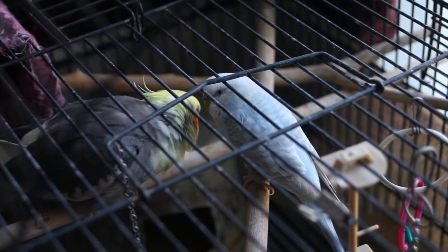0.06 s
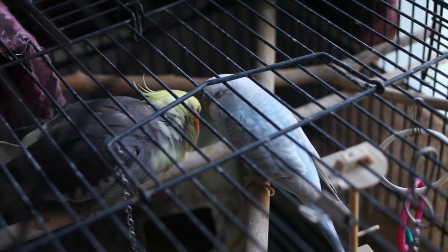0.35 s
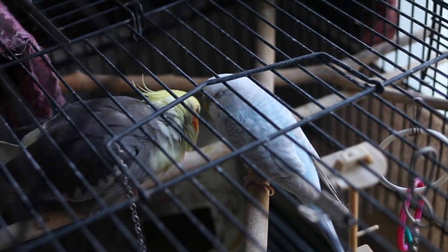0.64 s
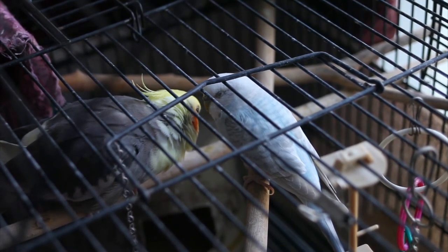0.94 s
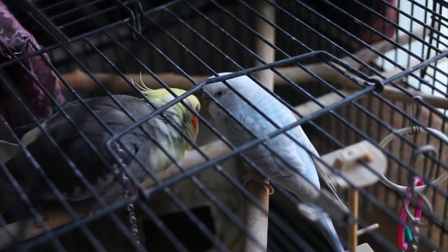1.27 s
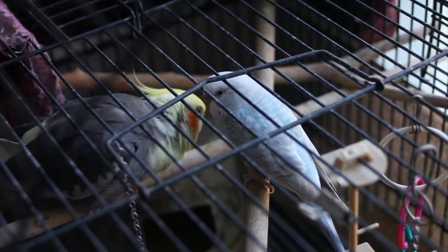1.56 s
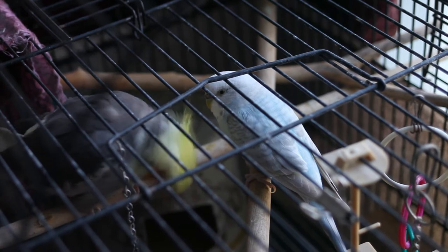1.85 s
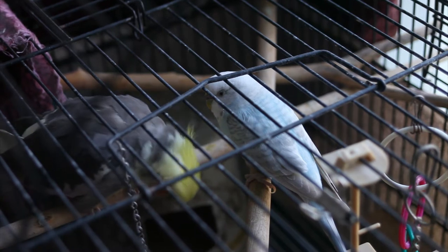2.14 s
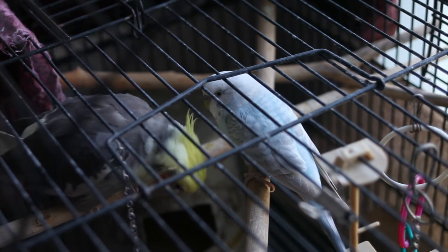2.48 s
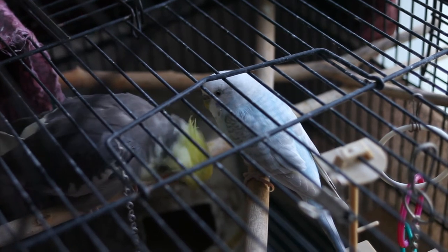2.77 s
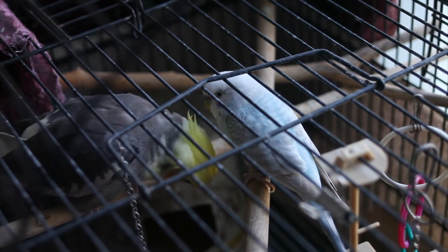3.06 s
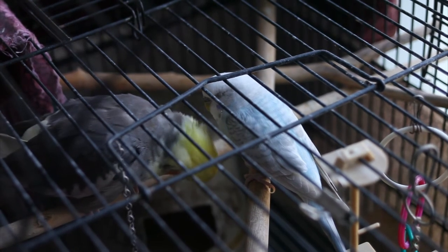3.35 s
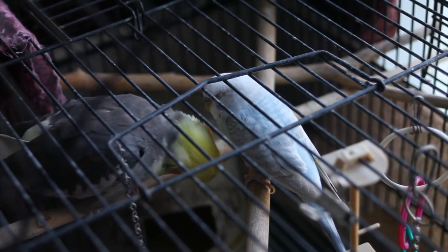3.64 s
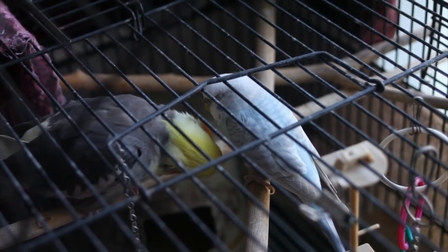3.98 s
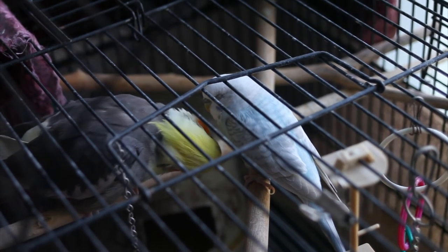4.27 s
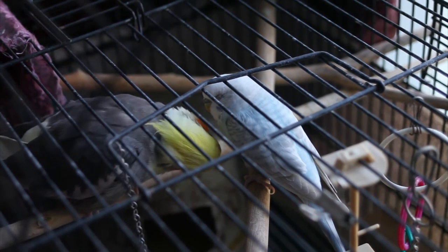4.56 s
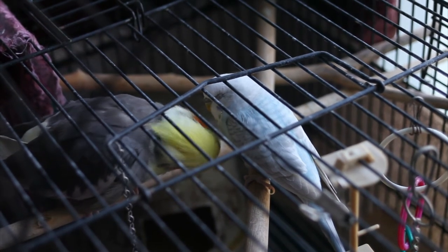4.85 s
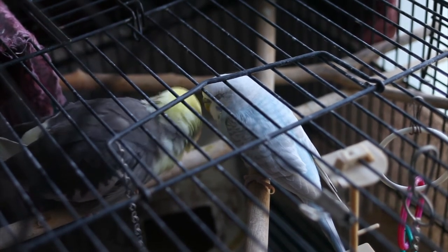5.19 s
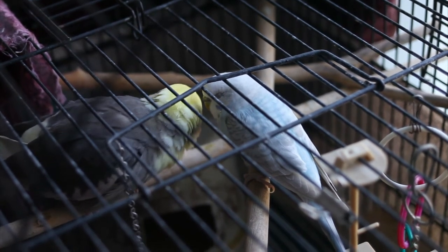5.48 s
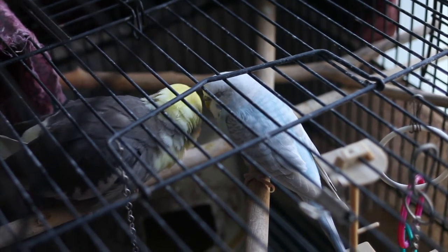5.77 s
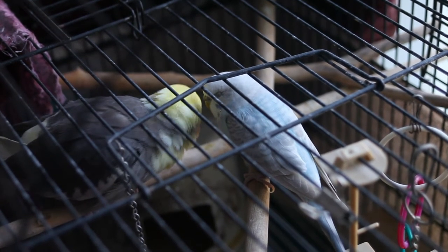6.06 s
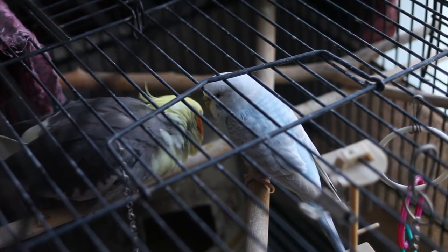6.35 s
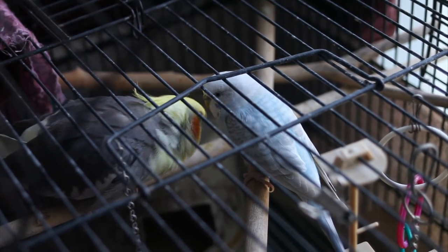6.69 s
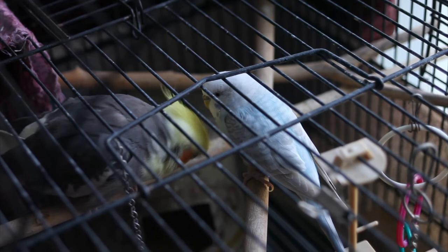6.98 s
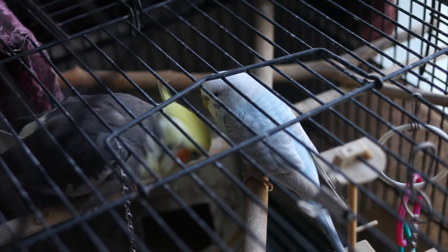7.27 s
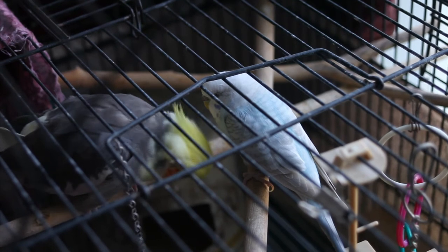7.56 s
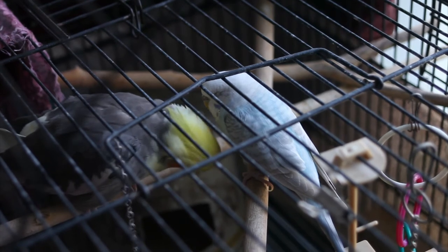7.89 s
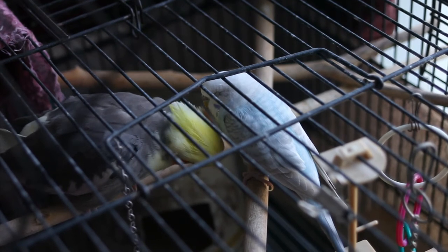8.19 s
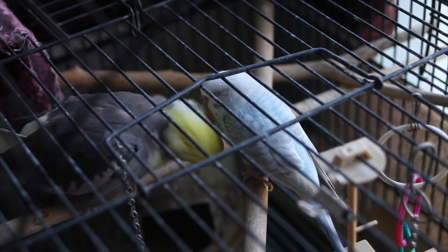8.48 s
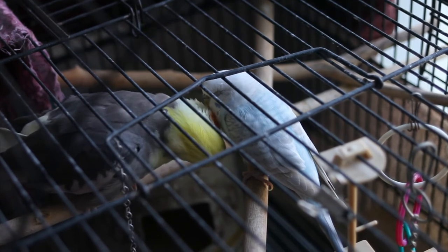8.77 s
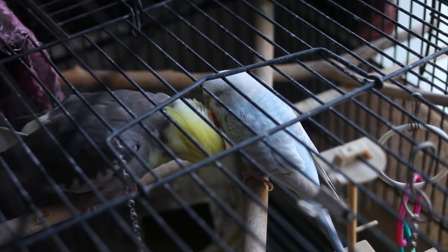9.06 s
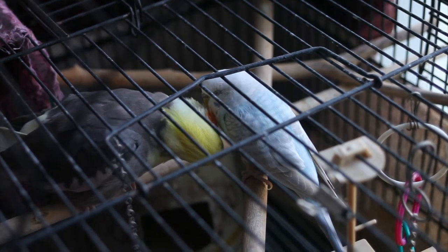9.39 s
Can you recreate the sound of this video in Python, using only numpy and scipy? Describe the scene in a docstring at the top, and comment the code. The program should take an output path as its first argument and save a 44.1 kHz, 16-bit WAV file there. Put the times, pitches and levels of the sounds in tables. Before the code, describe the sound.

In a small room, close to a cage, two small birds softly rustle their feathers. One gives a soft mew, breaks into dry clicks and whistled peeps, and ends with a sharp squawk. Three more short runs of clicking and peeping follow, with rustles and dull perch shuffles between. Behind them a motor hums steadily, a clock ticks softly and a distant bird twitters.

```python
"""A small room, the microphone close to a cage with two small birds. From the start a motor hums,
a clock ticks softly, feathers rustle in preening and a distant bird twitters. At 1.6 s one caged bird
mews and breaks into dry clicks and whistled peeps, all voiced by its syrinx, ending in a sharp squawk
at 2.2 s. A deep drone then fades from under the hum. Three more runs of chatter follow, near 4, 6.5
and 9 s, with rustles and dull shuffles on the perch in between."""
import sys
import numpy as np
from scipy import signal
from scipy.fft import rfft, irfft, next_fast_len
from scipy.io import wavfile
from scipy.ndimage import map_coordinates

SR = 44100
rng = np.random.default_rng(int(sys.argv[2]) if len(sys.argv) > 2 else 0)


def to_wav(sig):
    """Store sig (one row per channel, or 1-D mono) as 16-bit WAV at the path in sys.argv[1].

    Samples outside -1..1 are clipped; the rate is SR.
    """
    pcm = np.clip(np.atleast_2d(sig), -1, 1) * 32767
    pcm = np.round(pcm).astype(np.int16)
    wavfile.write(sys.argv[1], SR, pcm.T)  # frames by channels


N = 415863


def amp(db):
    """Decibels to gain."""
    return 10 ** (np.asarray(db) / 20)


def unit(x):
    """Scale to rms 1."""
    return x / np.sqrt(np.mean(x ** 2) + 1e-20)


def along(points, hz):
    """Read a curve of (Hz, value) points on a log frequency axis."""
    freqs, values = np.transpose(points)
    return np.interp(np.log(hz + 1), np.log(freqs + 1), values)


def times(length):
    """Sample times of a short sound, in seconds."""
    return np.arange(max(int(length * SR), 8)) / SR


def add(track, s, sound):
    """Mix a sound in at s seconds."""
    part = track[round(s * SR):][:len(sound)]
    part += sound[:len(part)]


def wobble(rate):
    """A smooth random curve, rate knots a second."""
    return map_coordinates(rng.standard_normal(N // 10), [np.arange(N) * rate / SR], mode="wrap")


def filtered(x, response):
    """Shape x by a gain that depends on frequency."""
    size = next_fast_len(N + 8192)
    return irfft(rfft(x, size) * response(np.fft.rfftfreq(size, 1 / SR)), size)[:N]


def low_cut(hz, edge_hz):
    """Gain that falls 24 dB per octave below the edge."""
    return (hz / edge_hz) ** 4 / np.sqrt(1 + (hz / edge_hz) ** 8)


def noise(spectrum):
    """Coloured noise of rms 1."""
    return unit(filtered(rng.standard_normal(N), lambda hz: amp(along(spectrum, hz))))


def tone(hz, drift_hz, waver_db):
    """A slightly unsteady sine of rms 1."""
    phase = 2 * np.pi * np.cumsum(hz + drift_hz * wobble(6)) / SR
    return unit(np.sin(phase) * amp(waver_db * wobble(7)))


def strokes(events, spectrum, grain_db, gain_db=0):
    """Grainy noise that swells and fades with each stroke."""
    envelope = np.zeros(N)
    for s, length, db in events:
        add(envelope, s, amp(db + gain_db) * np.hanning(len(times(length))))
    return envelope * unit(noise(spectrum) * amp(grain_db * wobble(700)))


# The room's rumble and hiss. Each row: frequency in Hz, relative noise density in dB.
AIR_RUMBLE = [(15, -50), (29, -22), (42, -7), (54, -4.5), (86, -10), (108, 0.5), (131, -7), (147, -5),
              (174, -6), (236, -8), (260, -9), (349, -10), (384, -14), (700, -21), (910, -66), (1540, -120)]
AIR_HISS = [(290, -27), (500, -17), (678, -6), (843, 2), (1060, -3), (1320, -2), (2160, -10.5),
            (2930, -8.5), (3200, -11), (4030, -12.5), (4660, -12.5), (7530, -14), (8210, -16.5),
            (15100, -23), (16000, -22.5)]
def room_air():
    """Air rushes softly all round the microphone."""
    return amp(-50) * noise(AIR_RUMBLE) + amp(-55) * noise(AIR_HISS)


def drone(db=-53, hold_s=2.34, fade_db_per_s=2.7):
    """A deep tone in the room holds, then fades."""
    fading_s = np.maximum(np.arange(N) / SR - hold_s, 0)
    return amp(db - fade_db_per_s * fading_s) * tone(70.7, drift_hz=0.65, waver_db=2.5)


# The motor's low and high tones. Each row: frequency in Hz, relative level in dB.
MOTOR_HUM = [(120, -55.5), (186.8, -55.5), (235.3, -53), (352.8, -63), (411, -69.5), (818.3, -82)]
MOTOR_WHINE = [(2985, -72.5), (3526, -77.5), (3908, -77), (6837, -79), (7811, -81), (9765, -85)]
def motor():
    """A motor runs steadily in the background: a wavering hum under a thin whine."""
    hum = sum(amp(db) * tone(hz, drift_hz=0.933, waver_db=1.5) for hz, db in MOTOR_HUM)
    whine = sum(amp(db) * tone(hz, drift_hz=9, waver_db=0) for hz, db in MOTOR_WHINE)
    return hum + amp(-1) * whine


# Resonances of the clock's case. Each row: frequency in Hz, relative noise density in dB.
CLOCK_CASE = [(500, -4), (1100, 8.5), (2000, -6), (5000, 4.5), (9000, -13), (11000, -16), (16000, -28)]
def clock(first_s=0.448, tick_s=0.03, db=-47, tock_db=-3):
    """A clock in the room steps once a second; every other step is softer."""
    steps = [(first_s + i, tick_s, db + tock_db * (i % 2)) for i in range(N // SR)]
    return strokes(steps, CLOCK_CASE, grain_db=0.5)


# Phrases from far off, the first already under way. Each row: start in seconds, relative level in dB.
FAR_PHRASES = [(-.18, -48), (0.556, -46.5), (1.244, -51), (2.69, -57), (3.269, -54.5), (4.02, -52.5),
               (4.82, -59), (5.69, -53.5), (7.07, -57), (8.55, -59)]
# The notes of one phrase. Each row: delay in seconds, top pitch in Hz, level offset in dB.
PHRASE_NOTES = [(0, 4710, -3), (0.116, 4173, 2), (.2, 3590, -7.5)]
def far_twitter(note_s=0.065, droop=0.22, quaver_rad=0.61, flicker_db=2, scatter=0.0113):
    """A distant bird repeats thin, quavering notes whose pitch droops at both ends."""
    out, t = np.zeros(N), times(note_s)
    progress = t / note_s
    swell = np.sqrt(np.sin(np.pi * progress))
    quaver = quaver_rad * wobble(450)
    notes = [(s + delay, top_hz, db + note_db)
             for s, db in FAR_PHRASES for delay, top_hz, note_db in PHRASE_NOTES if s + delay > 0]
    for (s, top_hz, db), detune in zip(notes, rng.standard_normal(len(notes))):
        pitch = top_hz * (1 + scatter * detune - droop * (2 * progress - 1) ** 2)
        phase = 2 * np.pi * np.cumsum(pitch) / SR + quaver[round(s * SR):][:len(t)]
        add(out, s, amp(db) * swell * np.sin(phase))
    return out * amp(flicker_db * wobble(60))


# Movements in the cage. Each row: start in seconds, length in seconds, relative level in dB.
FEATHER_RUSTLES = [(.20, 0.19, -62), (.76, 0.12, -58), (1.50, .3, -52), (3.46, 0.067, -57),
                   (4.40, 0.09, -56.5), (4.662, 0.057, -55), (6.047, 0.18, -57.5)]
PERCH_SHUFFLES = [(1.85, 0.54, -57), (4.38, 0.59, -64), (5.95, 0.75, -57)]
# Nibbles of the bill. Each row: start in seconds, relative level in dB.
BILL_NIBBLES = [(.372, -51), (0.883, -50), (1.712, -43), (1.906, -45), (2.736, -46.5), (2.919, -48),
                (5.9395, -46.5), (6.167, -49)]
# Bright feathers and the dull perch. Each row: frequency in Hz, relative noise density in dB.
FEATHER_COLOUR = [(1000, -1), (2500, 2), (5000, 3.5), (8000, 1.5), (10500, -15), (16000, -39)]
PERCH_COLOUR = [(250, -4), (500, 5), (900, -5), (1300, 4.5), (1900, -6), (4000, -10), (10000, -45)]
def preening(nibble_s=0.0051):
    """Close to the microphone, the birds rub and nibble their feathers and shuffle on the perch."""
    nibbles = [(s, nibble_s, db) for s, db in BILL_NIBBLES]
    feathers = strokes(FEATHER_RUSTLES + nibbles, FEATHER_COLOUR, grain_db=3, gain_db=1)
    return feathers + strokes(PERCH_SHUFFLES, PERCH_COLOUR, grain_db=2.5, gain_db=3)


def arched_call(throat, flutter, s, rise_s, fall_s, start_hz, top_hz, end_hz,
                db, swell_db, edge_s, waver, tremor_db):
    """The syrinx rises and falls in pitch; its harmonics slide through the throat's resonances."""
    out, t = np.zeros(N), times(rise_s + fall_s)
    before_top = np.maximum(1 - t / rise_s, 0)
    after_top = np.maximum(t - rise_s, 0) / fall_s
    arch_hz = top_hz - (top_hz - start_hz) * before_top ** 1.7 - (top_hz - end_hz) * after_top ** 1.7
    fade = np.clip(np.minimum(t, t[-1] - t) / edge_s, 0.001, 1)
    envelope = fade * amp(db + swell_db * t / t[-1] + tremor_db * wobble(150)[:len(t)])
    roughness = np.clip(0.2 + 1.45 * (1 - arch_hz / top_hz), 0, 1)  # cleanest at the top pitch
    pitch = arch_hz * (1 + waver * wobble(145)[:len(t)])
    pitch *= 1 + flutter * roughness * wobble(1105)[:len(t)]
    harmonic = np.arange(1, 14)[:, None]
    colour = amp(along(throat, harmonic * pitch)) * (harmonic * pitch < SR / 2)
    cycles = harmonic * np.cumsum(pitch) / SR + rng.random(harmonic.shape)
    voice = (colour * np.sin(2 * np.pi * cycles)).sum(0)
    rasp = 1 + 0.5 * roughness * wobble(879)[:len(t)]
    add(out, s, envelope * rasp * voice)
    return out


# The mew's arch. By name: times in seconds, pitches in Hz, levels in dB, waver as a share of pitch.
MEW_ARCH = dict(s=1.609, rise_s=.037, fall_s=0.044, start_hz=1785, top_hz=2083, end_hz=1617, db=-37.5, swell_db=3.5, edge_s=0.01, waver=0.0162, tremor_db=2.5)
# The throat's resonances in the mew. Each row: frequency in Hz, gain in dB.
MEW_RESONANCES = [(1900, -4.5), (4000, -7.5), (6100, -0.5), (7700, -2), (9000, -22), (10500, -35)]
def mew():
    """One soft call from the cage, swelling over a shallow arch of pitch."""
    return arched_call(MEW_RESONANCES, flutter=0.053, **MEW_ARCH)


# The squawk's arch, with the same names and units as the mew's.
SQUAWK_ARCH = dict(s=2.197, rise_s=0.0081, fall_s=.0105, start_hz=2264, top_hz=2845, end_hz=1148, db=-22, swell_db=10.3, edge_s=.001, waver=0.0042, tremor_db=-1)
# The throat's resonances in the squawk. Each row: frequency in Hz, gain in dB.
SQUAWK_RESONANCES = [(1100, -3), (2000, -12), (2800, -5), (4000, -2), (5600, -6.5), (8000, -4.5),
                     (9500, -14.5), (12000, -32.5), (16000, -33)]
def squawk():
    """One sharp, plunging call at close range; the small body radiates no bass."""
    voice = arched_call(SQUAWK_RESONANCES, flutter=0.092, **SQUAWK_ARCH)
    return filtered(voice, lambda hz: low_cut(hz, edge_hz=1160))


# Peeps from the cage. Each row: start in seconds, length in seconds, pitch in Hz,
# relative level in dB, overtone level in dB against the fundamental.
RISING_PEEPS = [(1.951, 0.028, 2550, -40, -11), (1.983, .024, 2500, -35, -14),
                (2.01, 0.027, 2517, -33, -12), (2.12, 0.0071, 2420, -43, -10),
                (2.225, .008, 2480, -38, -12), (4.042, .018, 2420, -38.5, -7),
                (4.143, 0.0058, 2526, -33, -4), (4.265, 0.0089, 2540, -31.5, -4),
                (6.358, 0.029, 2644, -32.5, -7), (6.564, 0.023, 2725, -32.8, -1),
                (6.65, 0.016, 2720, -45, -16), (6.901, .009, 2070, -33, -10),
                (6.993, 0.012, 2440, -33, -18), (9.034, 0.014, 2640, -29.5, -12)]
# Squeals during clucks. Each row: start in seconds, length in seconds, relative level in dB.
FALLING_SQUEALS = [(4.272, 0.0153, -34.5), (9.324, 0.023, -33)]
def whistles(peep_rise=0.025, squeal_hz=(2208, 1690), squeal_overtone_db=1.5, gain_db=-1, rasp_db=3.5):
    """Quavering whistles close by: peeps slide up a little, pressed squeals fall, rich in overtones."""
    notes = [(s, length, hz * (1 - peep_rise / 2), hz * (1 + peep_rise / 2), db, overtone_db)
             for s, length, hz, db, overtone_db in RISING_PEEPS]
    notes += [(s, length, *squeal_hz, db, squeal_overtone_db) for s, length, db in FALLING_SQUEALS]
    out, quaver = np.zeros(N), np.cumsum(0.021 * wobble(400)) / SR
    for s, length, start_hz, end_hz, db, overtone_db in notes:
        progress = times(length) / length
        pitch = start_hz + (end_hz - start_hz) * progress
        phase = 2 * np.pi * (np.cumsum(pitch) / SR + start_hz * quaver[round(s * SR):][:len(pitch)])
        swell = np.sqrt(np.sin(np.pi * progress))
        overtones = np.sin(2 * phase) + amp(-13) * np.sin(3 * phase)
        add(out, s, amp(db + gain_db) * swell * (np.sin(phase) + amp(overtone_db) * swell * overtones))
    return out * amp(rasp_db * wobble(300))


# Clucks from the cage, each a short run of clicks.
# Each row: start in seconds, length in seconds, clicks per second, relative level in dB.
CLUCK_RUNS = [(1.613, .003, 200, -36), (1.845, .003, 200, -37), (1.859, .014, 215, -37.5),
              (1.959, .02, 200, -33), (2.0084, .018, 140, -28), (2.091, .012, 125, -27),
              (2.195, .003, 200, -26), (3.7143, .003, 200, -37.5), (3.8772, .024, 137, -22.5),
              (4.0088, .03, 215, -26), (4.117, .004, 200, -25.5), (4.2714, .026, 210, -23.5),
              (6.564, .012, 260, -29), (6.766, .013, 210, -22.5), (6.7893, .003, 200, -27),
              (6.8813, .004, 200, -22.5), (6.8957, .009, 210, -29), (6.984, .016, 160, -24.5),
              (7.113, .004, 200, -23), (9.1304, .008, 200, -27), (9.232, .026, 240, -25.5),
              (9.328, .026, 215, -25.5)]
# The throat's resonances in a click. Each row: frequency in Hz, gain in dB.
CLICK_RESONANCES = [(1000, 8), (1600, -5.5), (2500, 4.5), (3000, -9), (3700, -1), (4600, -4.5),
                    (6000, -18.5), (7300, -12), (8600, -25), (12000, -27)]
def clicks(rise_s=0.001062, fall_s=0.001, high_hz=2600, low_hz=1500, jitter_s=0.00018, gain_db=-13.5):
    """Each close, dry click is a pip of a few cycles: the syrinx snaps open and its pitch drops."""
    # A louder cluck is brighter: the last value tilts the treble, in dB per octave.
    clucks = [(s, length, rate, db, 0.41 * (db + 24)) for s, length, rate, db in CLUCK_RUNS]
    # The voice catches in each peep with bright clicks, louder when its overtones are strong.
    catches = [(s + 0.005, length / 2, 230, db + overtone_db + 3, 6.5)
               for s, length, _, db, overtone_db in RISING_PEEPS]
    out, t = np.zeros(N), times(0.0092)
    harmonic = np.arange(1, 7)[:, None]
    swell = (t / rise_s) ** 2 * np.exp(2 - 2 * t / rise_s)
    drop_hz = low_hz + (high_hz - low_hz) * np.exp(-t / fall_s)
    rasp = 1 + 0.35 * wobble(2500)
    for s, length, rate, db, tilt in clucks + catches:
        for lag, (detune, late) in zip(np.arange(0, length, 1 / rate), rng.standard_normal((12, 2))):
            partial_hz = harmonic * drop_hz * np.exp(0.11 * detune)
            colour = amp(along(CLICK_RESONANCES, partial_hz) + tilt * np.log2(partial_hz / 3000))
            voice = (colour * np.sin(2 * np.pi * np.cumsum(partial_hz, axis=1) / SR)).sum(0)
            pip = unit(swell * voice * rasp[round((s + lag) * SR):][:len(t)])
            add(out, s - rise_s + lag + jitter_s * late, amp(db + gain_db) * pip)
    bill_band = signal.butter(7, (1120, 7800), btype="band", fs=SR, output="sos")
    return signal.sosfilt(bill_band, out)


def near_wall(x, delay_s=0.002153):
    """A close surface sends a second copy of each click to the microphone."""
    return filtered(x, lambda hz: 1 - 0.55 * np.exp(-2j * np.pi * hz * delay_s))


# The small room's tail. Each row: frequency in Hz, time to fall 60 dB in seconds.
ROOM_DECAY = [(500, 0.32), (2500, 0.26), (6000, 0.25), (12000, 0.26)]
def echoes(x, early_db, tail_db, early_decay_s=0.076, gap_s=0.0034):
    """Dense early echoes and a short tail reach the microphone, changing a little every quarter second."""
    out, t = np.zeros(N), times(0.4)
    step = SR // 4
    for i in range(0, N, step):
        hz, lag, spectrum = signal.stft(rng.standard_normal(len(t)), SR, nperseg=256)
        decay = amp(-60 * lag / along(ROOM_DECAY, hz)[:, None])
        tail = signal.istft(spectrum * decay, SR, nperseg=256)[1][:len(t)]
        early = rng.standard_normal(len(t)) * amp(-60 * t / early_decay_s)
        echo = amp(early_db) * early / np.linalg.norm(early) + amp(tail_db) * tail / np.linalg.norm(tail)
        add(out, i / SR + gap_s, signal.fftconvolve(x[i:i + step], echo))
    return out


def scene():
    """From beside the cage: the two birds close by, the twitter far off, the hum all round."""
    chatter = preening() + near_wall(clicks()) + mew()
    peeps, cry, far = whistles(), squawk(), far_twitter()
    birds = chatter + echoes(chatter, early_db=-11, tail_db=-12.5)
    birds += peeps + echoes(peeps, early_db=-8, tail_db=-10)
    birds += cry + echoes(cry, early_db=-5, tail_db=-13)
    birds += echoes(far, early_db=-4, tail_db=-8.5)  # the far bird arrives only by echoes
    return (birds + clock() + motor() + drone() + room_air())[None]


def record(dry, low_cut_hz=34, top_hz=15850):
    """One camera microphone, mono: it drops the deepest bass and keeps nothing above its band limit."""
    return filtered(dry[0], lambda hz: (hz < top_hz) * low_cut(hz, low_cut_hz))[None]


dry = scene()
out = record(dry)
to_wav(out)
```